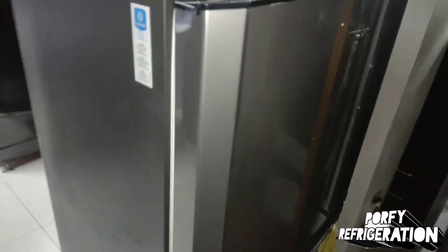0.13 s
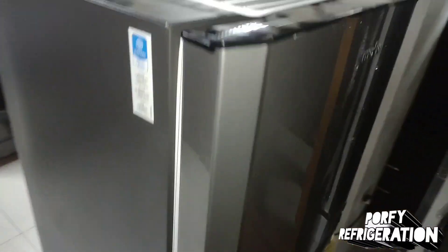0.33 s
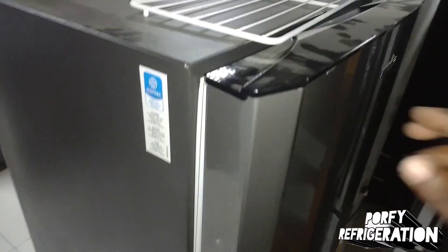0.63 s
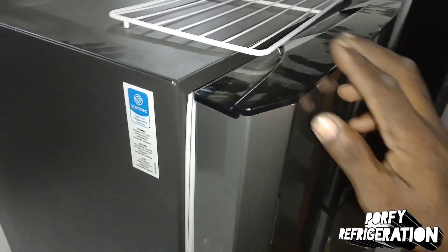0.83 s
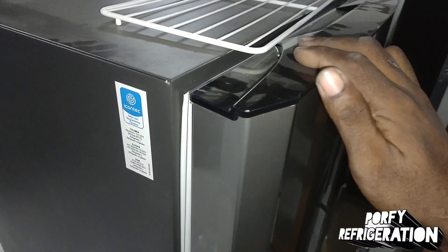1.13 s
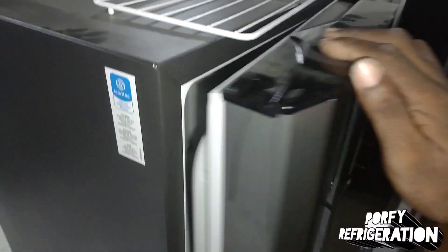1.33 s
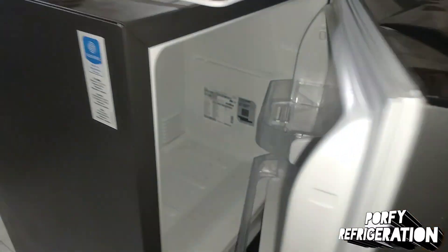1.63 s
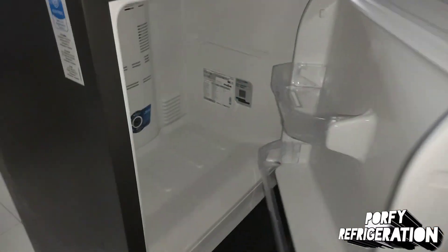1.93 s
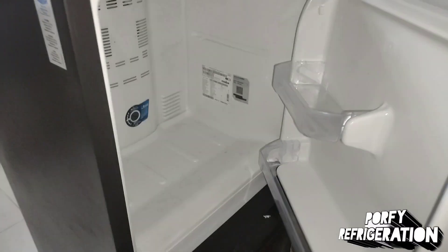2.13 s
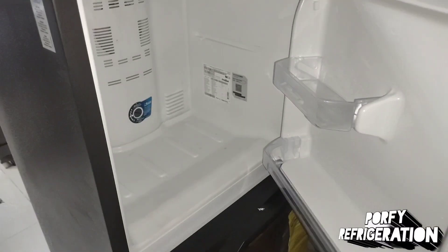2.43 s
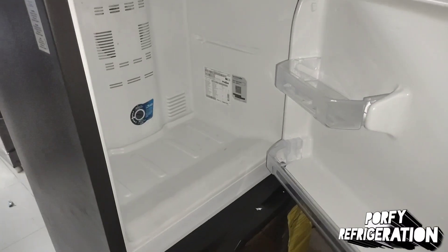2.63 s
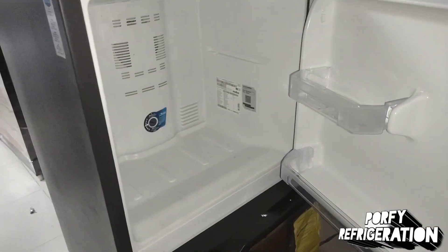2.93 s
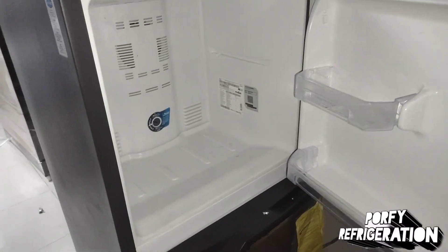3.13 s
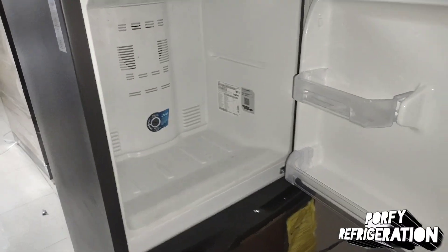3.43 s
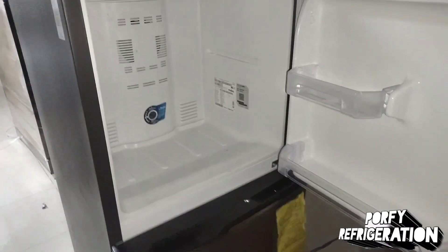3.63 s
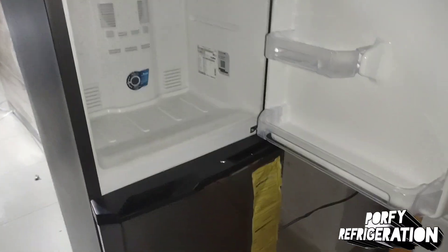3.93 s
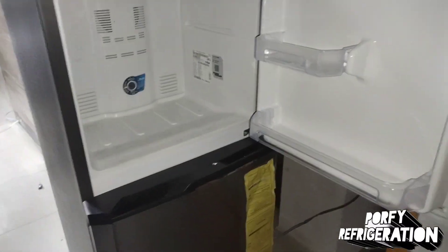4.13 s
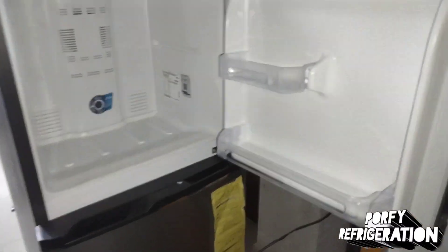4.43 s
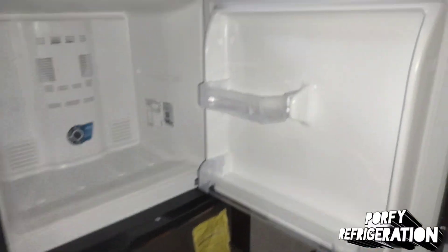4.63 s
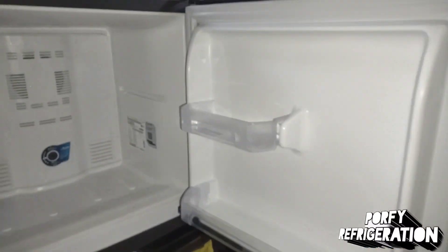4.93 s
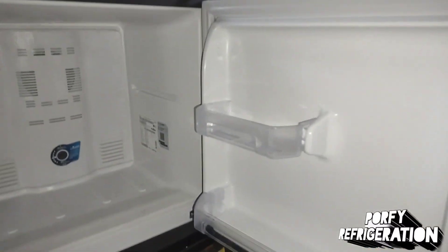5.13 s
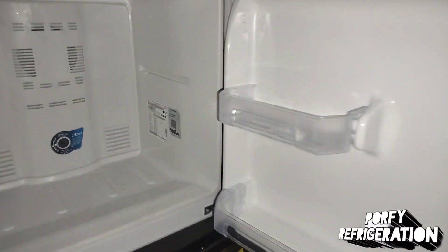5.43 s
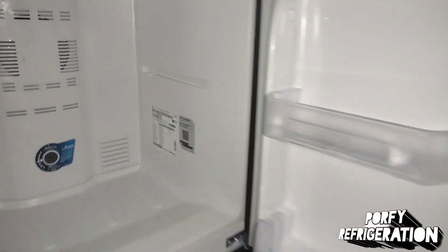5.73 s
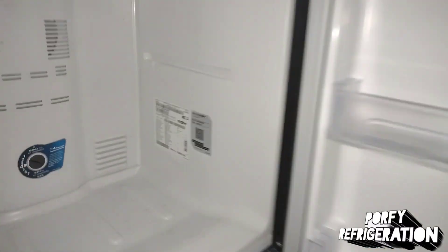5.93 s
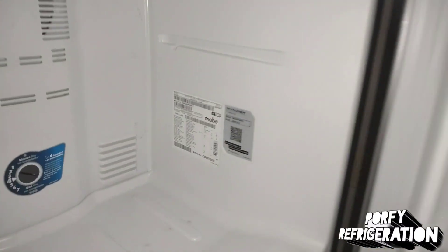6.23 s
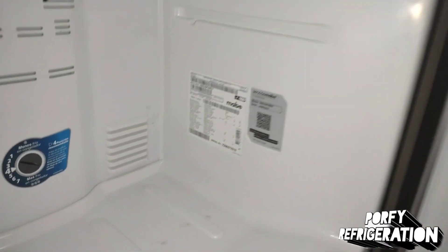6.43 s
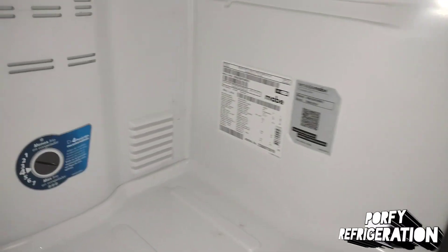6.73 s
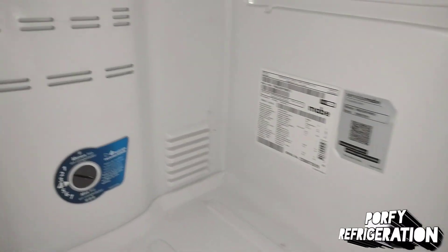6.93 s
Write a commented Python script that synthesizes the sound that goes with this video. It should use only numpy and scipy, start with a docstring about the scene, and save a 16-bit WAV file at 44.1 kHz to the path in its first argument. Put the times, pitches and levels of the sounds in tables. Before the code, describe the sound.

A muffled refrigerator hum behind light hand ticks, then the door peels open and the fan drone and vent air swell steadily closer.

```python
"""A muffled refrigerator hums in a workshop, then hands tick and rustle at its freezer door and pull it open.
Blade tones and vent air swell as the microphone pair moves inside; both are sines and shaped noise.
The air behind the door sings at a rising pitch like a bottle neck, and the hinge squeaks once.
Gasket, hands and clothes are grainy friction noise, ticks are noise bursts, knocks are damped rings.
Beneath lie the workshop's own noise floor and the faint tones of other machines."""
import sys
import numpy as np
from scipy import signal
from scipy.fft import rfft, irfft, next_fast_len
from scipy.io import wavfile
from scipy.ndimage import uniform_filter1d, map_coordinates

SR = 44100
rng = np.random.default_rng(int(sys.argv[2]) if len(sys.argv) > 2 else 0)


def master_out(mix):
    """Clip the mix to full scale and print it as 16-bit PCM to the path in sys.argv[1]."""
    frames = np.transpose(np.atleast_2d(mix))
    ceiling = np.clip(frames, -1, 1)
    pcm = np.round(ceiling * 32767).astype(np.int16)
    wavfile.write(sys.argv[1], SR, pcm)


N = 313110
MS = np.arange(0, N / SR + 1, 1 / 1000)  # slow controls are worked out once a millisecond [s]

# Workshop air and microphone hiss: (frequency [Hz], relative level [dB per Hz])
SHOP_SPECTRUM = [(15, -47.5), (25, -20), (48, -20.5), (205, -3), (371, -17), (473, -16.5), (556, -7),
                 (619, -16), (833, -15), (1180, -26.5), (3120, -28), (4810, -33), (8940, -29.5),
                 (12000, -37.5), (15800, -38)]
SHOP_DB = -64.5  # mean level
# Tones of other machines: (frequency [Hz], mean level [dB rms], unsteadiness [0 to 1])
FAR_TONES = [(176, -67.5, 0), (545, -79, .7), (834, -83, .7), (3107, -85, .35), (8737, -96, .5),
             (6760, -95, .5)]
# Likeness of the two ports: (frequency [Hz], likeness [0 to 1])
PORT_LIKENESS = [(60, 0.99), (150, 1), (380, 1), (950, 0.68), (2380, 0.17), (5980, 0.19), (15000, 0.06)]

# Path of the microphones: (time [s], place [-1 by the door, 0 a step back, 1 at the mouth, 2 inside],
# air level offset [dB], tone level offset [dB], further offset of the 3rd multiple [dB])
WALK = [(0, -1, 7, 0.19, 4), (.85, -0.65, -3, -0.67, -3.5), (1.3, -1.5, 0, -0.58, -1),
        (2.25, -1, 0.5, 0.74, -3), (2.45, -0.84, 0, 0, 0.5), (3.05, -0.78, 1, 0.91, 1),
        (3.45, -0.8, 1.5, -0.59, 6), (3.85, -0.52, 0.5, -1.187, 0), (4.2, -0.083, -.5, -0.13, -1.5),
        (4.6, 0.032, 0.5, -0.2, -0.5), (5.0, 0.53, 0, -0.36, -2.5), (5.35, 0.75, 0, -1.2, 4),
        (5.65, 0.87, -1, 0.6, 1), (5.9, 1.03, 1, 0.19, 0), (6.25, 1.39, 0.5, 1, -2),
        (6.5, 1.735, 0, 0.32, 2.5), (6.8, 1.85, 0, -0.85, -0.5), (7.1, 1.88, 0.5, 0.15, -2)]
# Left over right at the four places: (level [dB])
PAN_DB = [-0.3, 0.5, -0.4, 3]
# The fan sound reaches the left port first; its lead grows from the door, through a step back
# and the mouth, to inside: (lead of the left port [ms])
LEFT_LEAD_MS = [.13, .19, .24, .27]
SWING_S = 0.15  # time scale of the door's swing

BLADE_HZ, COMPRESSOR_HZ = 109.4, 58.4
# 1st to 4th multiple of the blade rate, then the compressor, all before the offsets of the walk:
# (door half open [s], door shut [dB], by the door [dB], a step back [dB], at the mouth [dB], inside [dB])
TONE_LEVELS = [(1.36, -71, -46, -49.5, -53.5, -29), (1.65, -68, -43, -46, -37, -26.5),
               (1.56, -99, -46, -47.5, -42, -39), (1.7, -84, -56.5, -71.5, -62.5, -47),
               (1.4, -87, -70.5, -70, -81, -54)]
# Compartment roar, vent rush, vent hiss, rumble (before the walk's offset), then faint steady treble:
# (door half open [s], door shut [dB], by the door [dB], a step back [dB], at the mouth [dB], inside [dB])
AIR_LEVELS = [(1.547, -71.5, -40.5, -43, -38.5, -28), (1.583, -73.5, -48, -47, -48, -39),
              (1.477, -80, -53.5, -54, -58.5, -41), (1.3, -77.5, -66.5, -64, -75.5, -52.5),
              (2, -78.5, -84, -80.5, -94, -64.5)]
# Roar of the compartment: (frequency [Hz], relative level [dB per Hz])
ROAR_SPECTRUM = [(50, -31.5), (85, -24), (107, -4), (172, 2.5), (220, -2), (240, -2), (295, 0.5),
                 (328, -2.5), (362, -1.5), (398, -10.5), (480, -18.5), (620, -43), (1060, -120)]
# Rush at the vents from in front of the door: (frequency [Hz], relative level [dB per Hz])
RUSH_FAR = [(240, -23), (400, -8.5), (472, -4), (505, -1.5), (538, 2.5), (580, -3.5), (655, -5.5),
            (733, -5.5), (818, -15.5), (1100, -24), (1430, -36), (2420, -120)]
# Rush at the vents from close by: (frequency [Hz], relative level [dB per Hz])
RUSH_NEAR = [(240, -30), (400, -4.5), (437, -3), (492, -8.5), (547, 2), (595, -4), (755, -1), (1020, -19),
             (1100, -17.5), (1430, -43), (2420, -120)]
# Vent hiss in front of the door: (frequency [Hz], relative level [dB per Hz])
HISS_FRONT = [(530, -44), (900, -5.5), (981, 2.5), (1220, -4.5), (1380, -3.5), (1660, -7.5), (1790, -8),
              (2820, -12.5), (3670, -25), (3950, -30), (5000, -41), (6500, -51.5), (11000, -120)]
# Vent hiss at the mouth of the compartment: (frequency [Hz], relative level [dB per Hz])
HISS_MOUTH = [(530, -20.5), (900, -5.5), (1090, -19.5), (1260, 0), (1400, -18.5), (1630, -5.5),
              (1860, -18.5), (2070, -10.5), (2570, -18.5), (2860, -16.5), (3440, -26), (4520, -31),
              (5000, -30), (6500, -56), (11000, -120)]
# Vent hiss inside the compartment: (frequency [Hz], relative level [dB per Hz])
HISS_INSIDE = [(530, -39), (900, -0.5), (1030, -11.5), (1290, -5), (1430, -14), (1860, -13), (2390, -10.5),
               (2660, -17.5), (2880, -17.5), (3140, -21), (5000, -34.5), (6500, -67), (11000, -120)]
# Low rumble: (frequency [Hz], relative level [dB per Hz])
RUMBLE_SPECTRUM = [(12, -57), (20, -22), (54, -17), (73, -8.5), (95, -1), (120, -30.5), (210, -120)]

# Strokes of gasket, hands and clothes: (peak time [s], relative peak level [dB], rise over 20 dB [s],
# fall over 20 dB [s], brightness of the top octave [dB])
RUSTLE_STROKES = [(.099, -61.5, .02, .2, -6), (.128, -59, .04, .13, -10), (.15, -68.5, .06, .9, -14),
                  (.19, -65, .1, .15, -9), (1.22, -74.5, 0.4, 4, -10.5), (1.295, -72, .12, .05, 0),
                  (1.326, -58.5, .025, .16, 0), (1.417, -58, .015, .17, -6), (1.45, -59, .07, .13, -9),
                  (1.505, -64, .15, .03, -14), (4.915, -65.5, .13, .1, -6), (4.72, -73, .08, .06, 0),
                  (1.8, -68, 0.1, 0.5, -2.5), (2.18, -67, 0.48, 0.8, -14), (3.41, -73, .02, .03, -19),
                  (3.59, -69, .06, .4, -5), (3.8, -68.5, .5, .6, -11), (4.04, -66.5, .5, .12, -6),
                  (4.48, -70, .04, .2, -2), (4.58, -74.5, 3, 0.1, -8.5), (5.13, -77.5, 0.22, 1, -7),
                  (5.53, -83, 1, 3, -4), (5.745, -69, .03, .15, 0), (6.36, -65, 0.5, 0.14, -19.5)]
# Body of the rustle: (frequency [Hz], relative level [dB per Hz])
CLOTH_SPECTRUM = [(590, -22), (1000, 0.5), (1110, -5.5), (1790, -0.5), (2200, -1), (3200, -1.5), (4070, -2),
                  (8600, -2.5), (10400, -6), (12000, -15.5), (15600, -32), (22000, -120)]
# Top octave of the rustle: (frequency [Hz], relative level [dB per Hz])
SHEEN_SPECTRUM = [(10000, -59), (11000, -0.5), (13000, -2.5), (15800, -1)]
STEADY_BRIGHT_DB = -7.5  # brightness of the steady treble

# Dull scrape, gasket peeling, air at the vent slots: (peak time [s], peak level [dB], rise over 20 dB [s],
# fall over 20 dB [s], band centre [Hz], band width [Hz])
BAND_HISSES = [(.07, -65, 1, .3, 4300, 4600), (1.328, -52.5, .022, .16, 9600, 4600),
               (1.418, -54, .015, .18, 8500, 4600), (3.7, -60.5, 1.6, 1.8, 1630, 240),
               (5.2, -76, 4, 3, 6400, 1200), (7.1, -66, 1.6, 1, 6600, 1600),
               (5.86, -63, .12, 1.1, 1630, 80), (6.27, -57, 1, .1, 1630, 80), (6.4, -59, .2, .3, 1530, 80)]
# Ticks: (time [s], peak level before the band filter [dB], left over right [dB], decay by 60 dB [s],
# lowest frequency [Hz], highest frequency [Hz])
TICKS = [(.068, -44, 3, .02, 2510, 7000), (1.005, -50, -1, 0.098, 697, 2960),
         (1.0857, -50, 6, .0102, 6030, 20000), (.1232, -42, 5, .035, 700, 12000),
         (.9985, -47, 1, .008, 700, 6000), (1.2615, -50, 2, .05, 7200, 13000),
         (1.3165, -52, 5, .02, 700, 15000), (1.331, -44, 3, .03, 700, 3000),
         (1.4152, -42, 3, .025, 4500, 15000), (3.403, -53, 5, .015, 1000, 6000),
         (4.561, -52.5, 13, .014, 1500, 9000), (4.6888, -48, 8, .022, 1000, 8000),
         (4.7205, -55, 8, .045, 1300, 7000), (6.4059, -55, 8, .045, 3500, 11000),
         (1.4436, -43, 4, .02, 1500, 8000), (1.459, -45, 3, .025, 1500, 6000),
         (1.4155, -44, 3, .03, 500, 3500), (5.5281, -60, 10, .0147, 4000, 20000)]
# Finger knocks: (time [s], level before the swell [dB], frequency [Hz], decay by 60 dB [s],
# left over right [dB])
THUDS = [(.119, -47, 272, .12, 0), (.9987, -42, 1700, .0035, 0), (.9994, -44, 3400, .0035, 0),
         (.9965, -41, 108, .08, 0), (1.005, -53, 380, .06, 0), (1.0088, -42, 200, .03, 0),
         (4.6887, -23, 720, .01, 14), (4.689, -35, 1400, .006, 10), (4.6897, -42, 2600, .006, 10),
         (4.7215, -43, 1600, .012, 8)]

# The air behind the door rings higher as the gap widens.
GAP_START_S, GAP_SHUT_HZ, GAP_OPEN_HZ, GAP_HZ_PER_S = 1.372, 92, 148, 54
# Its own ring: mean level at the peak, times to 20 dB under it
GAP_PEAK_S, GAP_DB, GAP_RISE_S, GAP_FALL_S = 1.92, -45, .4, .45
# Lift of the blade tone on the resonance, half width of that lift,
# cut of the blade tone while the resonance is still below it
GAP_LIFT_DB, GAP_WIDTH_HZ, GAP_CHOKE_DB = 18.5, 4.3, -5
SQUEAK_S, SQUEAK_LENGTH_S, SQUEAK_DB, SQUEAK_HZ, SQUEAK_ARCH_HZ = 2.452, .105, -67, 2900, 120
TOP_HZ = 15810  # upper band limit


def amp(db):
    """Decibels to a gain."""
    return 10 ** (np.asarray(db) / 20)


def unit(x):
    """Scaled to rms 1."""
    return x / np.sqrt(np.mean(x ** 2) + 1e-20)


def along(points, hz):
    """Value at hz between (Hz, value) points, on a log frequency axis."""
    f, v = np.transpose(points)
    return np.interp(np.log(hz + 1), np.log(f + 1), v)


def curves(rows):
    """One value per sample for each column after the time."""
    s, *cols = np.transpose(rows)
    return [np.interp(np.arange(N) / SR, s, c) for c in cols]


def wobble(rate):
    """A smooth random curve, rate knots a second."""
    knots = rng.standard_normal(int(N * rate / SR) + 4)
    return map_coordinates(knots, [np.arange(N) * rate / SR])


def smooth(control):
    """A millisecond control at every sample."""
    return np.interp(np.arange(N) / SR, MS, control)


def sides(pan_db):
    """Left and right gains for a left-over-right level."""
    return amp(pan_db / 2 * np.array([[1], [-1]]))


def stroke_db(peak_s, peak_db, rise_s, fall_s):
    """A level that climbs to a peak and falls off, straight in dB (per millisecond)."""
    t = MS - peak_s
    return peak_db - 20 * np.where(t < 0, -t / abs(rise_s), t / abs(fall_s))


def heard_db(rows):
    """Level of each layer: muffled until the door swings open, then set by where the microphones stand."""
    place = np.interp(MS, *np.transpose(WALK)[:2])
    levels = []
    for half_s, shut_db, *open_db in rows:
        here_db = np.interp(place, np.arange(-1, 3), open_db)
        opening = 1 / (1 + np.exp((half_s - MS) / SWING_S))
        levels.append(smooth(shut_db + (here_db - shut_db) * opening))
    return levels


def filtered(x, response):
    """x times a complex response of frequency."""
    m = next_fast_len(N + 8192)
    return irfft(rfft(x, m) * response(np.fft.rfftfreq(m, 1 / SR)), m)[..., :N]


def noise(spectrum, patchy_db, likeness=1):
    """Stereo noise of rms 1, patchy in time and pitch; the mid-side balance sets how alike the ports are."""
    z = signal.stft(rng.standard_normal((2, N)), nperseg=512)[2]
    field = uniform_filter1d(rng.standard_normal(z.shape[1:]), size=6, axis=0)
    field = uniform_filter1d(field, size=12, axis=1)
    pair = signal.istft(z * amp(patchy_db * unit(field)), nperseg=512)[1][:, :N]

    def mid_side_response(hz):
        turn = np.arccos(np.clip(likeness * along(PORT_LIKENESS, hz), -1, 1)) / 2
        return amp(along(spectrum, hz)) * [np.cos(turn), np.sin(turn)]

    mid, side = filtered(pair, mid_side_response)
    return unit(np.array([mid + side, mid - side]))


def shop():
    """Broadband floor of the room plus faint sines of other machines, some with wandering phase and level."""
    t = np.arange(N) / SR
    out = amp(SHOP_DB + .5 * wobble(4.6)) * noise(SHOP_SPECTRUM, patchy_db=1.5, likeness=0.49)
    for hz, db, unsteady in FAR_TONES:
        port_phase = rng.normal(0, 0.64, (2, 1))
        phase = 2 * np.pi * hz * t + unsteady * (0.99 * wobble(12) + port_phase)
        out += np.sqrt(2) * amp(db + 3 * unsteady * wobble(5)) * np.sin(phase)
    return out


def gap_hz():
    """Resonance of the air behind the opening door, rising steadily between its two ends."""
    rising = GAP_SHUT_HZ + GAP_HZ_PER_S * (np.arange(N) / SR - GAP_START_S)
    return np.clip(rising, GAP_SHUT_HZ, GAP_OPEN_HZ)


def hum():
    """Blade tone, its multiples and the compressor at nearly steady pitch, the same at both ports."""
    t = np.arange(N) / SR
    wander = .15 * wobble(1.2)  # the shaft speed drifts a little [rad]
    orders = [1, 2, 3, 4, COMPRESSOR_HZ / BLADE_HZ]
    *_, tone_db, third_db = curves(WALK)
    levels = heard_db(TONE_LEVELS) + tone_db
    levels[2] += third_db
    # the gap resonance sweeps across the blade tone
    off = (BLADE_HZ - gap_hz()) / GAP_WIDTH_HZ
    levels[0] += GAP_LIFT_DB / (1 + off ** 2) + GAP_CHOKE_DB / (1 + np.exp(-off))
    out = np.zeros((2, N))
    for k, db in zip(orders, levels):
        phase = k * (2 * np.pi * BLADE_HZ * t + wander) + rng.uniform(0, 2 * np.pi)
        out += np.sqrt(2) * amp(db + .3 * wobble(4)) * np.sin(phase)
    return out


def refrigerator():
    """Tones and turbulent flow; the hiss changes colour as the microphones move in between the walls."""
    walk, air_db, *_ = curves(WALK)
    roar_db, rush_db, hiss_db, rumble_db = heard_db(AIR_LEVELS[:4]) + air_db
    place = np.clip(walk, 0, 2)
    flow = wobble(8)  # rush and hiss waver together

    roar = amp(roar_db) * noise(ROAR_SPECTRUM, patchy_db=.3, likeness=.95)

    near = np.clip(place, 0, 1)
    rush = np.sqrt(1 - near) * noise(RUSH_FAR, patchy_db=1.0, likeness=1.0)
    rush = rush + np.sqrt(near) * noise(RUSH_NEAR, patchy_db=0.86, likeness=0.7)

    hiss = 0
    for k, colour in enumerate([HISS_FRONT, HISS_MOUTH, HISS_INSIDE]):
        share = np.sqrt(np.clip(1 - abs(place - k), 0, 1))
        hiss = hiss + share * noise(colour, patchy_db=.7)

    rumble = amp(rumble_db + 1.5 * wobble(3.7)) * noise(RUMBLE_SPECTRUM, patchy_db=4.0, likeness=0.71)
    rumble = rumble * sides(2.4)

    air = roar + amp(rush_db + 0.38 * flow) * rush + amp(hiss_db + 1.0 * flow) * hiss + hum()
    # half of the lead on each side, in samples
    lead = np.interp(walk, np.arange(-1, 3), LEFT_LEAD_MS) * SR / 2000
    left = map_coordinates(air[0], [np.arange(N) + lead], mode="nearest")
    right = map_coordinates(air[1], [np.arange(N) - lead], mode="nearest")
    ports = np.array([left, right])
    return (ports + rumble) * sides(np.interp(walk, np.arange(-1, 3), PAN_DB))


def rustle():
    """Grainy friction noise over a steady trace of treble; each stroke sets its own top octave."""
    steady = amp(heard_db(AIR_LEVELS[4:])[0] + .8 * wobble(5)) ** 2  # power
    powers = [amp(stroke_db(*row[:4])) ** 2 for row in RUSTLE_STROKES]
    bright_powers = [p * amp(2 * row[4]) for p, row in zip(powers, RUSTLE_STROKES)]
    level = np.sqrt(steady + smooth(sum(powers)))
    top = np.sqrt(steady * amp(2 * STEADY_BRIGHT_DB) + smooth(sum(bright_powers)))
    grain = amp(2 * wobble(1100))
    body = unit(grain * noise(CLOTH_SPECTRUM, patchy_db=1.3))
    sheen = unit(grain * noise(SHEEN_SPECTRUM, patchy_db=1.2)) * sides(5)
    return amp(4.5) * level * body + amp(5.0) * top * sheen


def band_hisses():
    """Scrape, peeling gasket and slot air: grainy noise in one band, swelling and fading."""
    out, grain = 0, amp(2 * wobble(900))
    for *stroke, hz, width_hz in BAND_HISSES:
        edges = [hz - width_hz / 2, hz + width_hz / 2]
        band = signal.butter(3, edges, "bandpass", fs=SR, output="sos")
        hiss = unit(grain * signal.sosfilt(band, rng.standard_normal((2, N))))
        out = out + amp(smooth(stroke_db(*stroke))) * hiss
    return out


def ticks():
    """Small dry contacts: short decaying bursts of noise, each in its own band."""
    out, t = np.zeros((2, N + SR)), np.arange(SR // 8) / SR
    for s, db, pan_db, t60, low_hz, high_hz in TICKS:
        burst = rng.standard_normal((2, len(t))) * amp(db - 60 * t / t60) * sides(pan_db)
        band = signal.butter(2, [low_hz, min(high_hz, SR / 2.2)], "bandpass", fs=SR, output="sos")
        start = round(s * SR)
        out[:, start:start + len(t)] += signal.sosfilt(band, burst)
    return out[:, :N]


def thuds():
    """A soft contact: a damped ring that swells over its first cycle."""
    out, t = np.zeros((2, N + SR)), np.arange(SR // 4) / SR
    for s, db, hz, t60, pan_db in THUDS:
        swell = 1 - np.exp(-t * hz / .8)
        ring = -amp(db - 60 * t / t60) * np.sin(2 * np.pi * hz * t) * swell
        start = round(s * SR)
        out[:, start:start + len(t)] += ring * sides(pan_db)
    return out[:, :N]


def door_gap():
    """The wider the gap, the higher the air spring rings: a nearly pure tone with uneven strength."""
    t = np.arange(N) / SR - GAP_PEAK_S
    db = GAP_DB - 20 * np.where(t < 0, t / GAP_RISE_S, t / GAP_FALL_S) ** 2
    hz = gap_hz() + 3 * wobble(12)
    return np.sqrt(2) * amp(db + 1.5 * wobble(21.8)) * np.sin(2 * np.pi * np.cumsum(hz) / SR)


def hinge():
    """A short rough squeak whose pitch and strength arch up and down."""
    u = np.clip((np.arange(N) / SR - SQUEAK_S) / SQUEAK_LENGTH_S, 0, 1)
    arch = np.sin(np.pi * u)
    hz = SQUEAK_HZ + SQUEAK_ARCH_HZ * arch + 130 * wobble(400)
    level = np.sqrt(2 * abs(arch)) * amp(SQUEAK_DB + 3 * wobble(150))
    return level * np.sin(2 * np.pi * np.cumsum(hz) / SR)


def scene():
    """All sources at the two microphone ports."""
    return shop() + refrigerator() + rustle() + band_hisses() + ticks() + thuds() + door_gap() + hinge()


def record(dry):
    """The microphones pass nothing above their band limit."""
    return filtered(dry, lambda hz: hz < TOP_HZ)


dry = scene()
out = record(dry)
master_out(out)
```